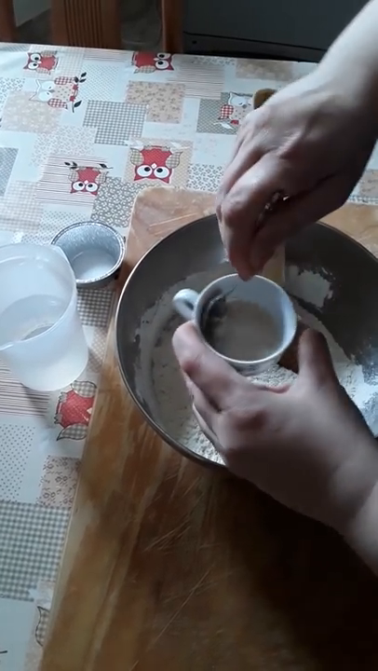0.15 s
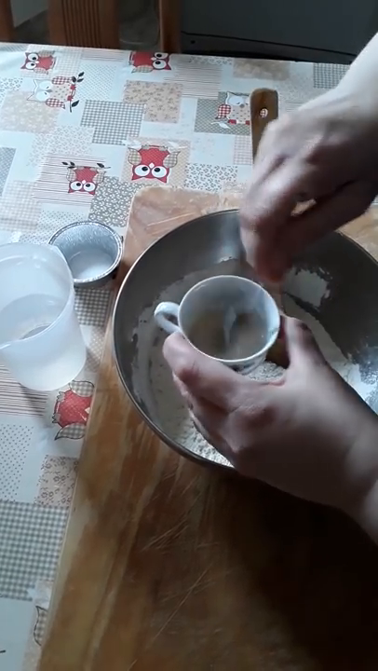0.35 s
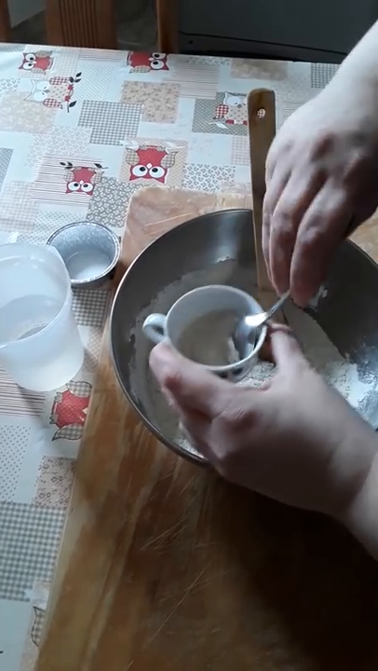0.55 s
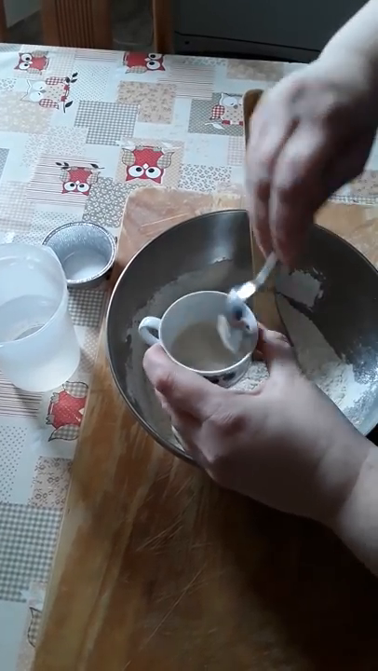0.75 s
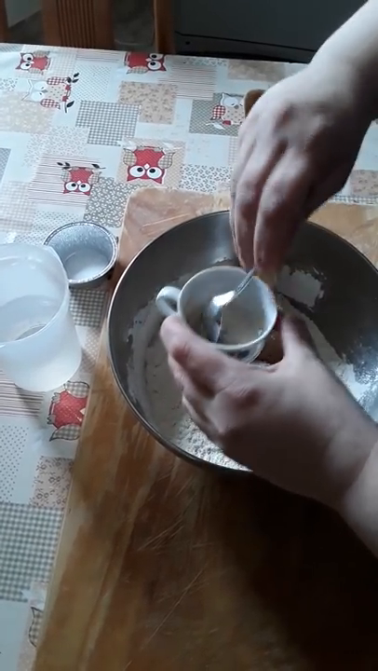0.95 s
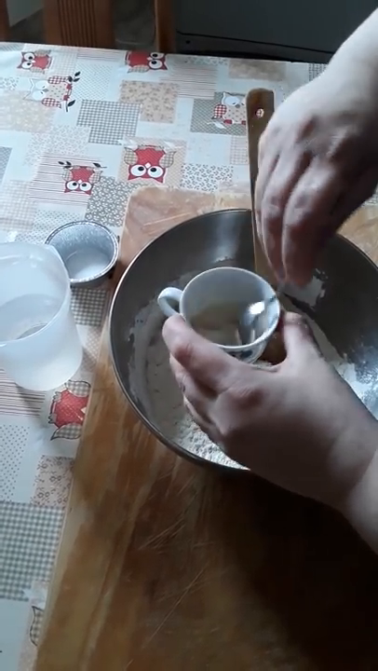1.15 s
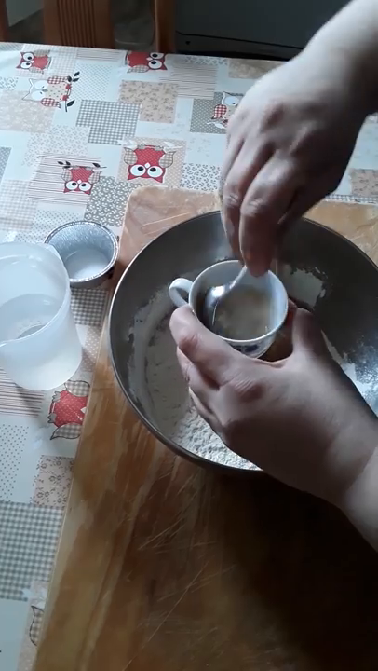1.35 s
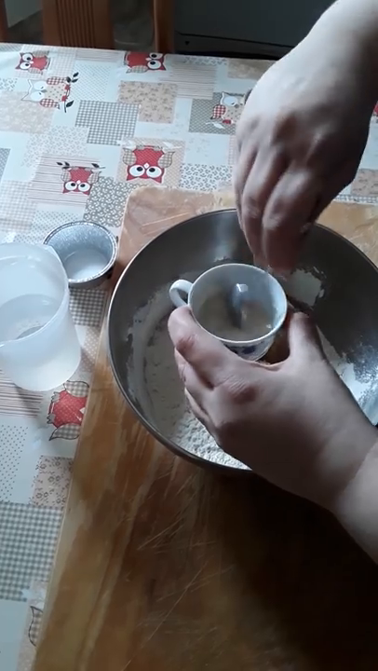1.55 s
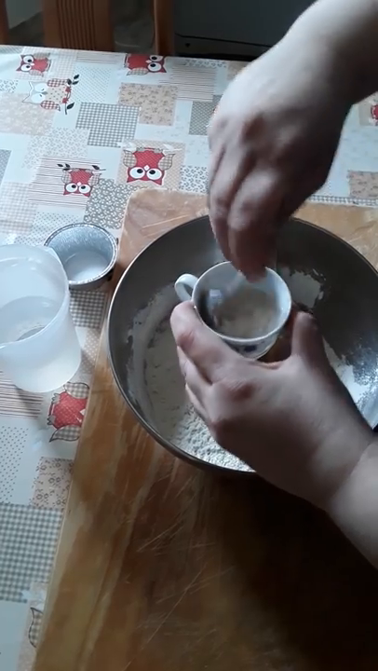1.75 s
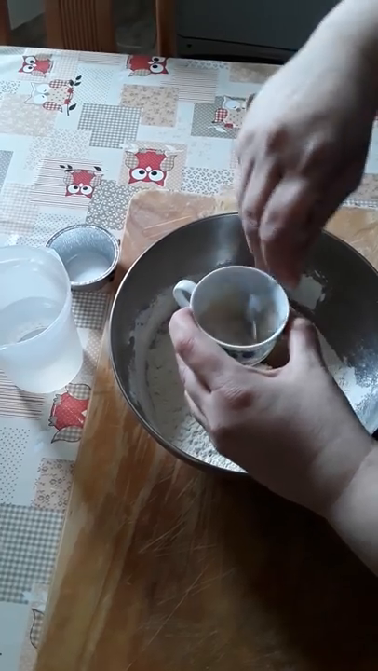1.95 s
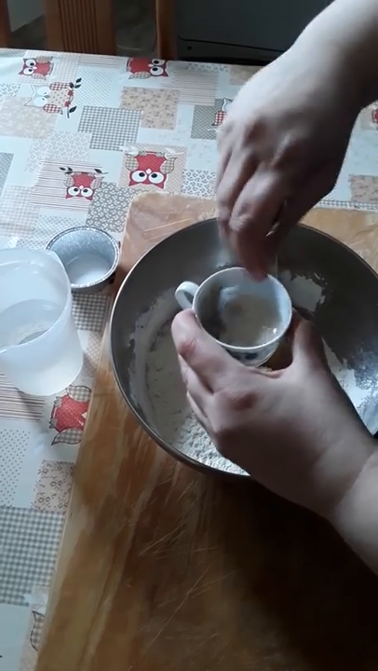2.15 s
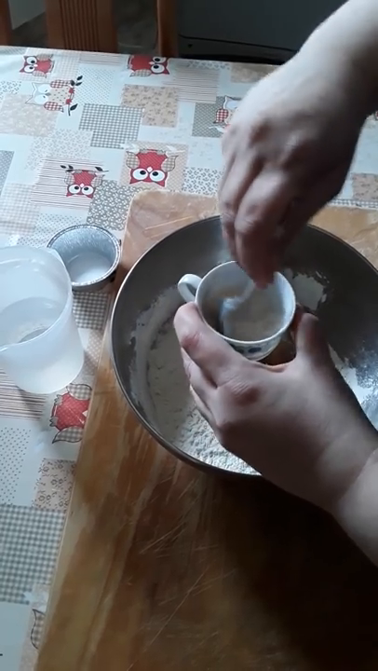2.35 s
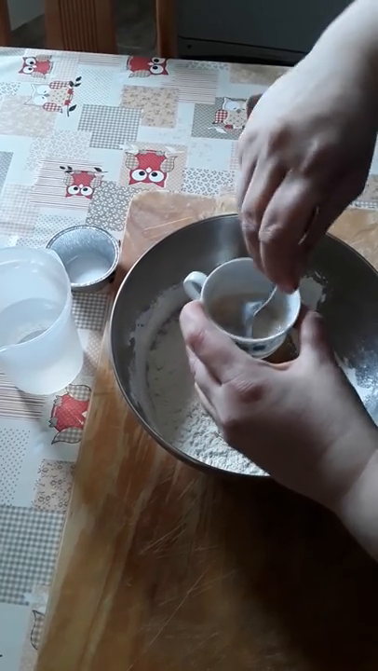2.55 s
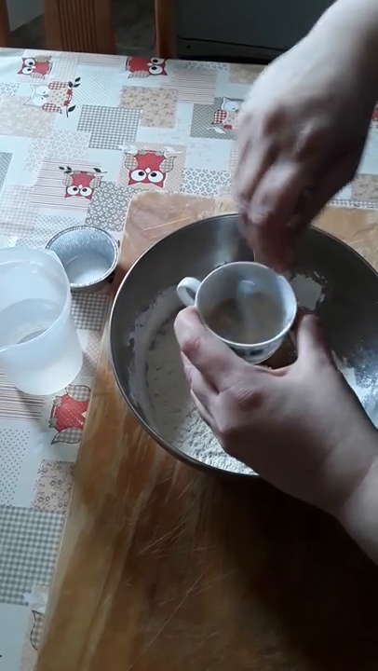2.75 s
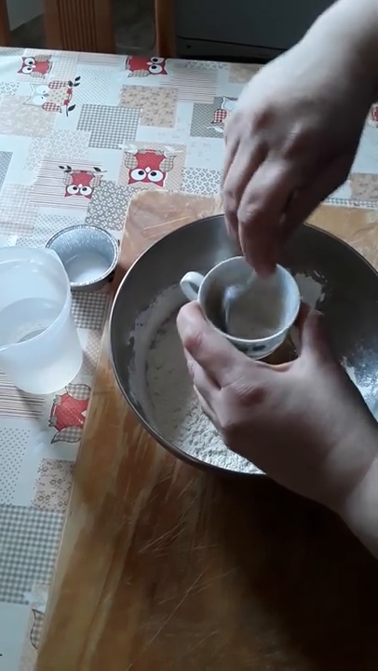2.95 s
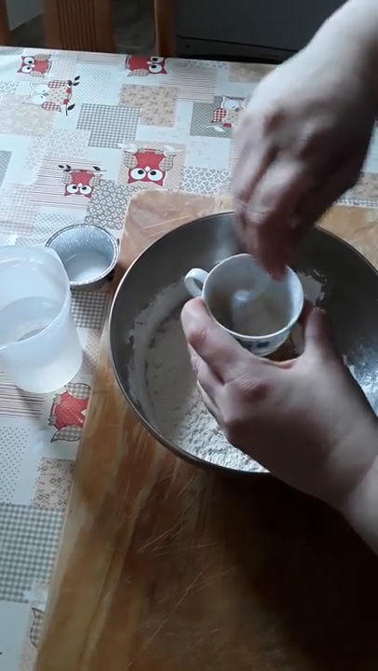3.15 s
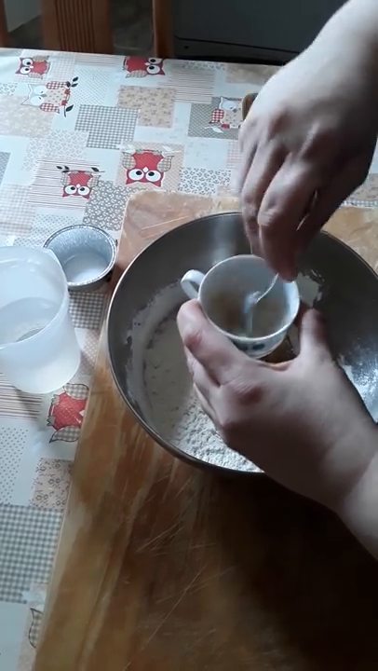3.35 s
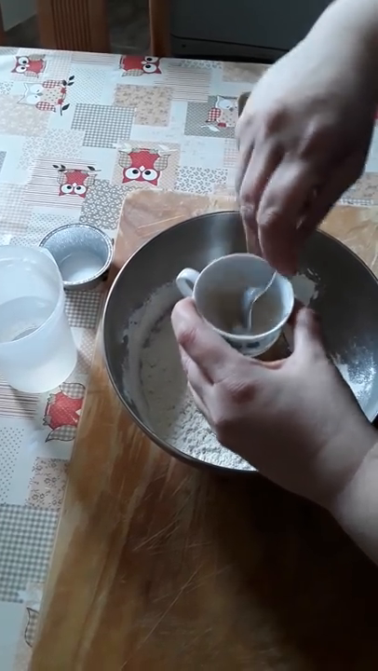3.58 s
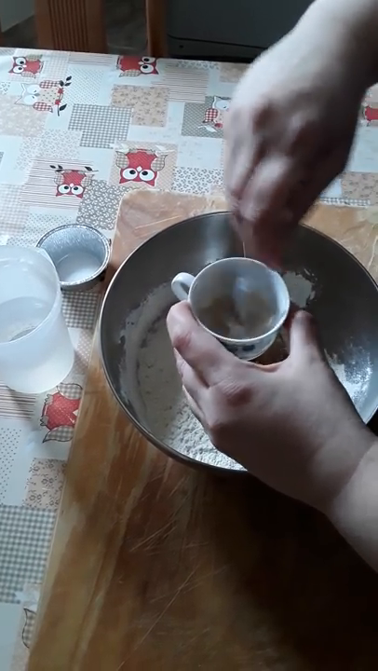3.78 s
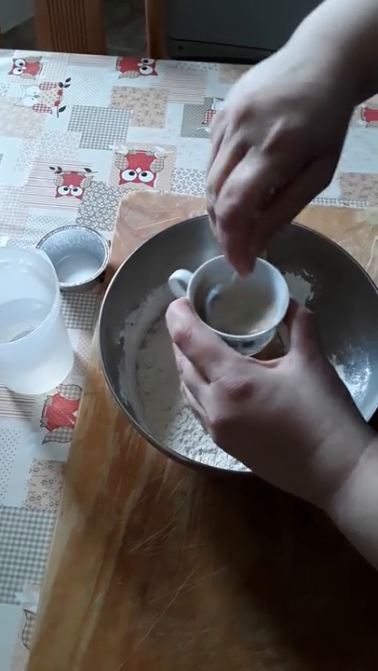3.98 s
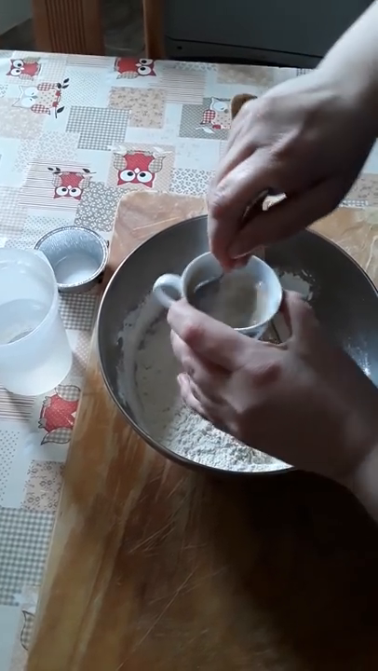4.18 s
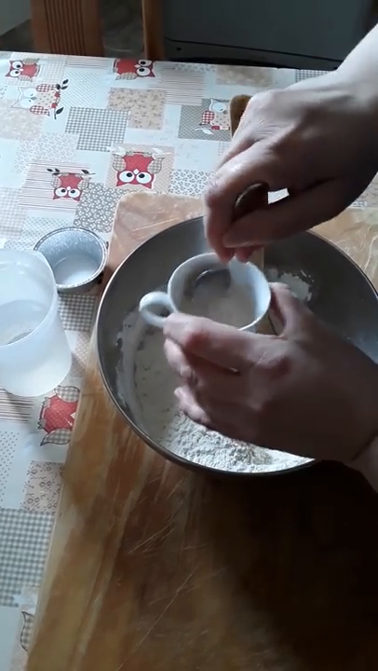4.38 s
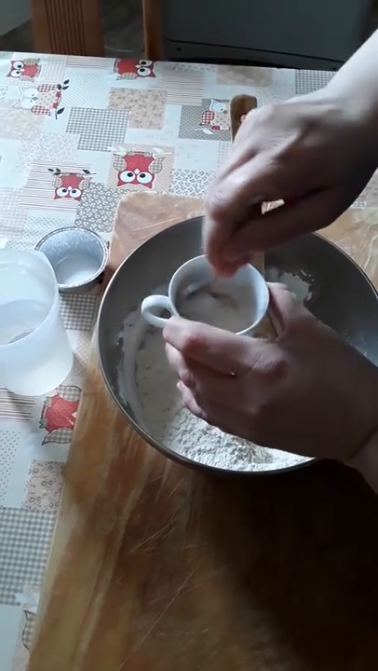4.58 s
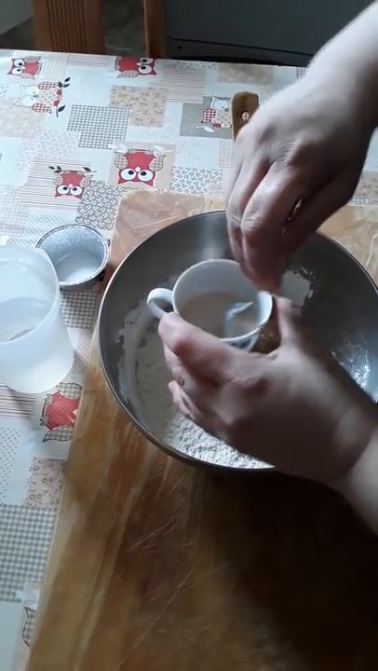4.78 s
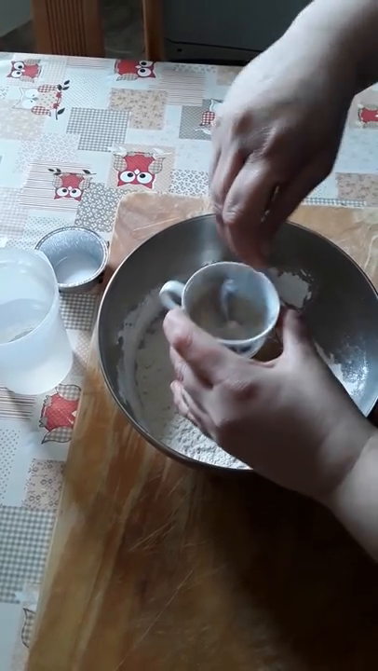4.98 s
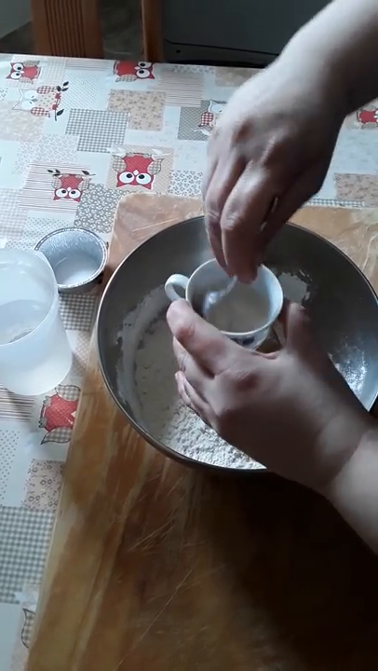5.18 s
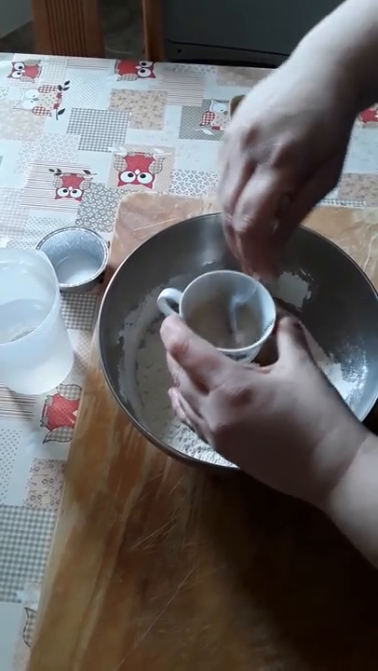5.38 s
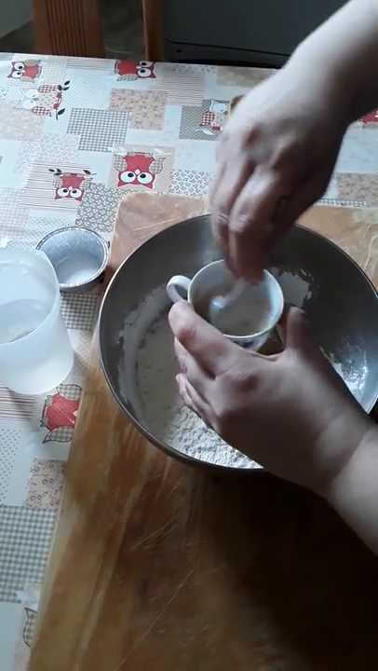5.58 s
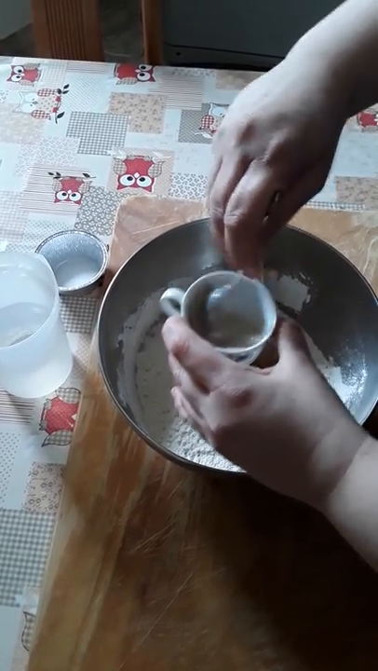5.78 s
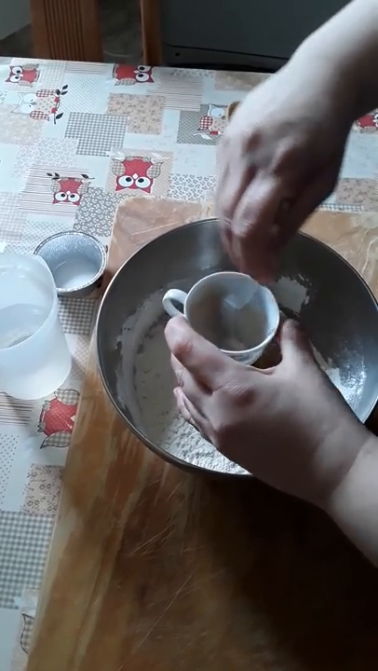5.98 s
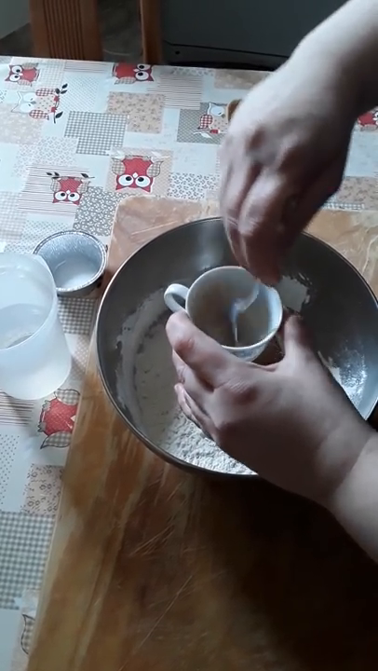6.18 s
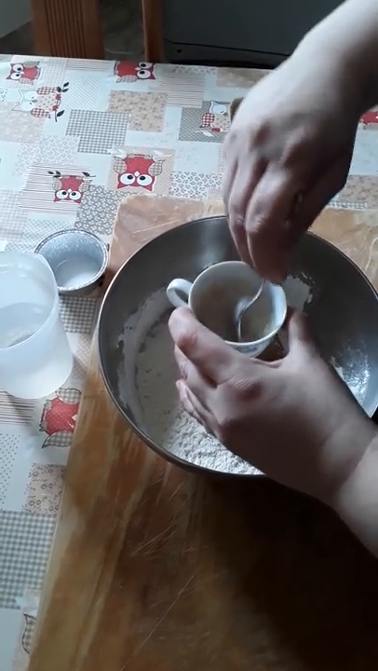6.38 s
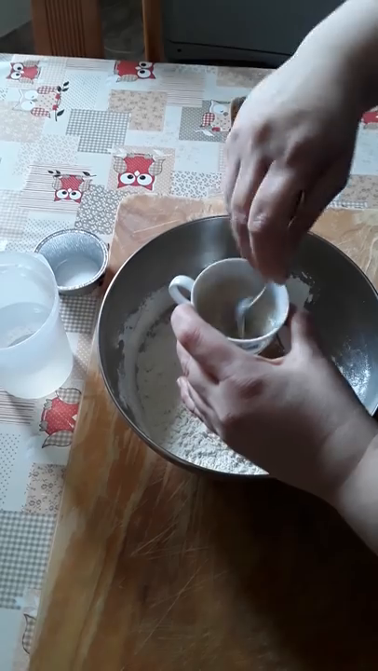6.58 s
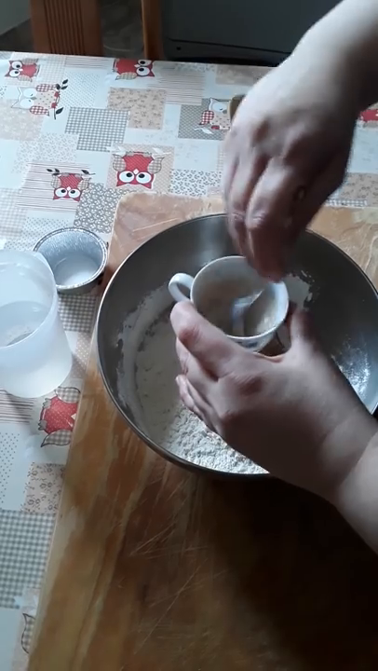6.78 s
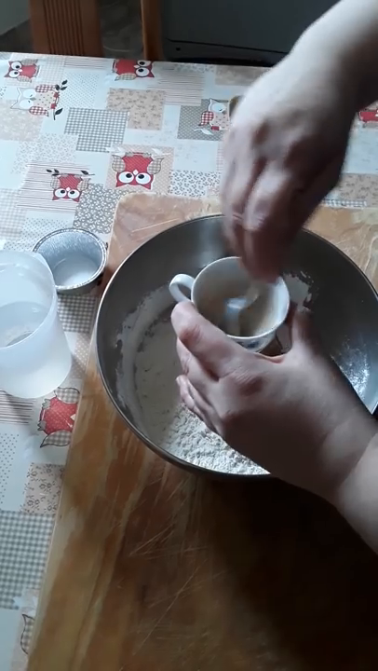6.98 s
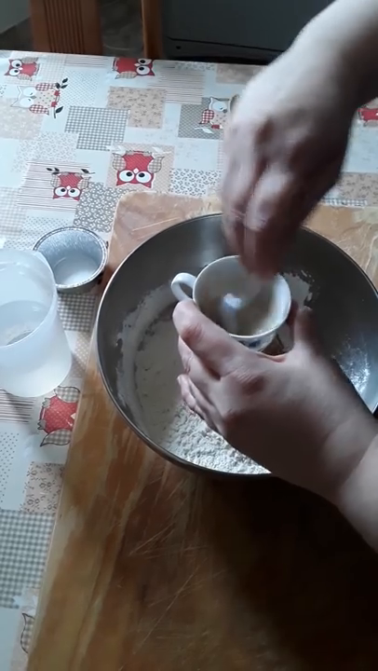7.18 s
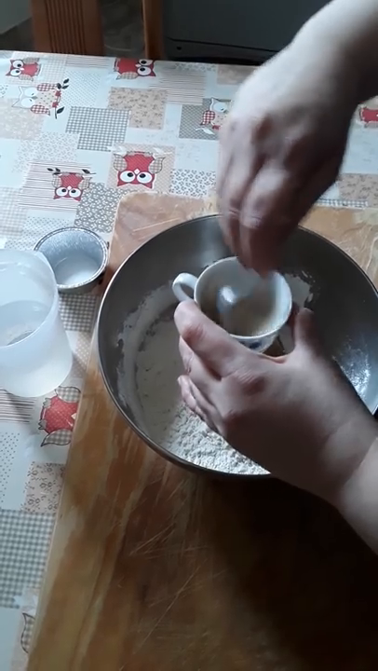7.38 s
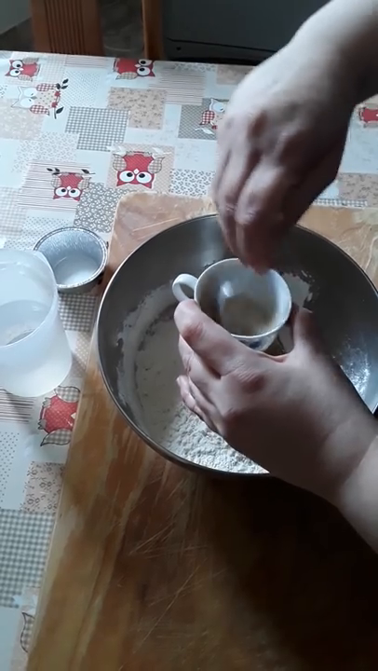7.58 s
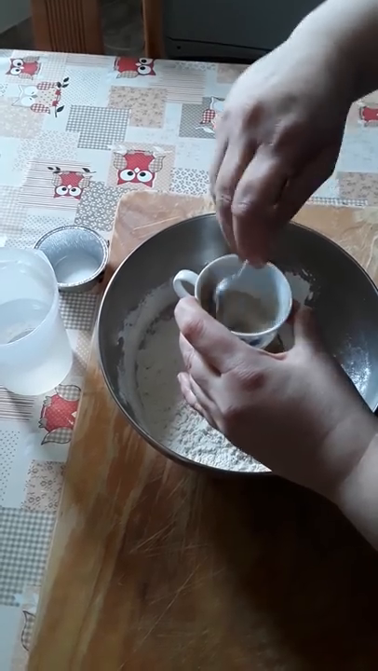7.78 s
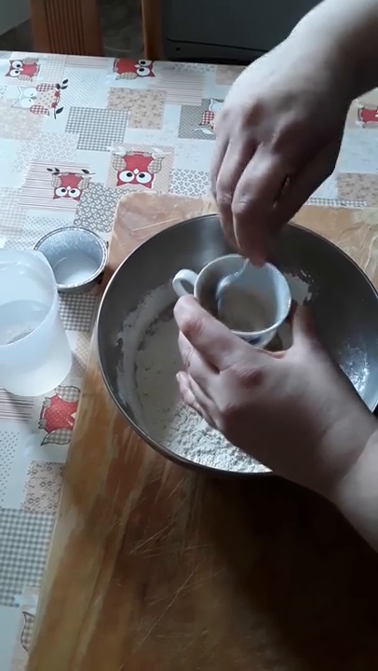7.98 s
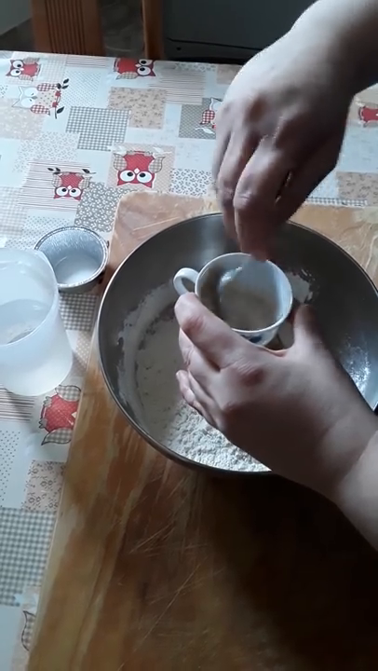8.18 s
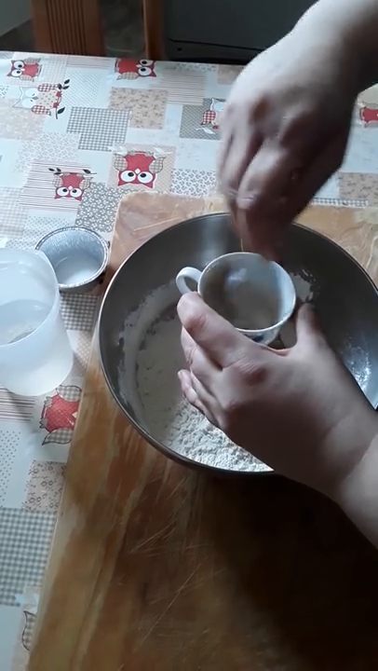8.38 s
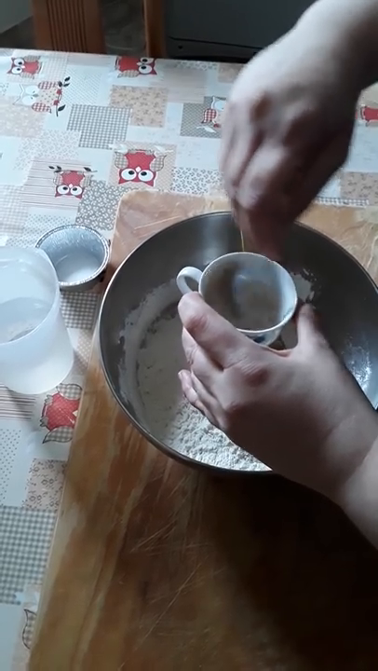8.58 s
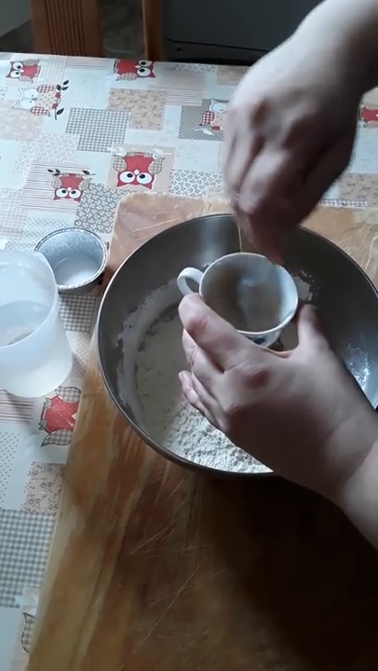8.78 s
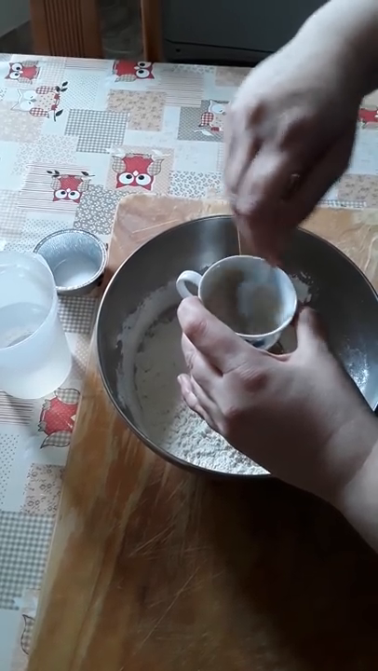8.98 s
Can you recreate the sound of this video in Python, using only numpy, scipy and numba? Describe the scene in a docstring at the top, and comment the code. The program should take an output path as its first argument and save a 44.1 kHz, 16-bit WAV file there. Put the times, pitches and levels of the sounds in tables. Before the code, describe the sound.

A metal spoon stirs water in a small china cup, clinking irregularly and rubbing round the wall in a hard, echoing kitchen.

```python
"""A steel spoon stirs water in a hand-held china cup in a hard-walled kitchen, over rumble and hiss.
The room still rings from a blow before the start; then clinks (short damped modes, a thud, a noise crack) go on.
Between them filtered random slips make the rub of the spoon on the glaze, two strokes a turn.
A far wavering sine hums from 2.7 to 6 s; three dull knocks (decaying sines) fall at 4.4 s and, close together,
near 4.9 s. From about 6.3 s the rubbing stays strong to the end."""
import sys
import numpy as np
from scipy import signal
from scipy.fft import rfft, irfft
from scipy.io import wavfile
from numba import njit

SR = 44100
rng = np.random.default_rng(int(sys.argv[2]) if len(sys.argv) > 2 else 0)


def transcribe(u):
    """Save the signal u as a 16-bit wav file named by the first command-line argument.

    u: samples, shape (n,) or (channels, n), limited to [-1, 1]; the rate is SR.
    q: integer samples, one column per channel.
    """
    v = np.clip(np.atleast_2d(u).T, -1, 1)
    q = np.round(v * 32767).astype(np.int16)
    wavfile.write(sys.argv[1], SR, q)


N = 398663
LEAD = SR // 4   # samples before time 0, so that an earlier blow can ring on in the room

# Blows of spoon on cup. Each row: start in seconds, strength in dB, dullness in dB, hollowness in dB,
# edge in dB, clack in dB, length of the chattering contact in ms.
BLOWS = [(-0.12, -16.5, 11.0, 2, 0.0, 2, 1.3), (0.4524, -35, 1, 3.0, -11.5, -5.0, 1.1),
         (0.4645, -24, 7, 0.0, -18, -1, 3.7), (0.5665, -27, 7.5, 8, -14, 7, 4.7),
         (0.5866, -6, -25, 0.5, -38, -15, 3.6), (0.672, -6, -27, 0, 7, 8, 4.2),
         (1.0553, -13, 8, 4.0, -3, 4.5, 1.9), (1.199, -32, 6.5, 6.5, -2.0, 10, 2.8),
         (1.2457, -17, -7, -7.5, -8, 3.5, 3), (1.472, -34.5, -8, -9, -7, 2, 3.7),
         (1.5085, -35.5, 6.5, 1, -17, 1.5, 0.54), (1.7137, -17.5, 3.5, 7.5, 11, -4, 5.8),
         (1.727, -16.5, -2, -4.0, -1, -8, 2.1), (1.857, -25, 1.5, -2, 7.5, -7.0, 3.7),
         (1.9094, -26.0, 6.5, -16.0, 0, 0, 2.4), (1.9272, -29.5, 4, 4.5, 4.5, 2.0, 5.1),
         (2.082, -12.5, -4.0, -1, 8, 0.5, 4.8), (2.2216, -18.0, 1, 1, 11.5, -3, 3.9),
         (2.6482, -22.0, 2.5, 3.0, -29, -2, 2.8), (2.7149, -28, 9, 8, -4.5, -6.5, 2.0),
         (2.806, -23, 5.5, 6, 12, 1, 4.6), (3.322, -17.5, 1, 4.0, 2, -4, 2.2),
         (3.5566, -14.5, 2, 3.5, 7.5, -4.0, 3.9), (3.8026, -14.5, 3.5, 5, 5, -4, 3.7),
         (4.2665, -36, 5.5, 9.5, 4, 12.5, 1.2), (4.4634, -17, -19, -8, 0, -10, 2.3),
         (5.0296, -19.5, -2, -5, -2, 0, 3.4), (5.0402, -18, 5.5, 3, -44, -3.5, 2.2),
         (5.1013, -29.5, -0.5, 1, -18, 5, 5.1), (5.1555, -32, -26.0, -29.5, -7.0, -3, 2.4),
         (5.2361, -32, -9, -11, 5, 4, 2.1), (5.2862, -33.0, -15, -16.5, -10, -9, 2.6),
         (5.312, -15.5, 4.5, -2, -12, 0.5, 2.9), (5.481, -13.5, 6.0, 1, 12.0, -0.5, 3.5),
         (5.684, -21.5, 10.0, 8.5, -2, 5.5, 1.9), (5.8143, -6, 2.5, -0.5, 9.5, 1.5, 4.4),
         (6.1029, -18.5, -4.5, 0.5, -5, 8, 3), (6.3237, -14.5, -6, 7.5, 5.5, 2, 3.1),
         (6.539, -11, 1, 4.5, -5, 0.0, 2.15), (6.7521, -10.5, -4, 2.5, 0, 0.5, 2.6),
         (6.8436, -21.5, 5.0, 4.5, -2, 6, 4.6), (6.9473, -7, -2.5, -3.5, 11.5, -0.5, 3.6),
         (7.1625, -6, -1.5, -2, 11.5, 0.5, 5.7), (7.2753, -25.5, 5.5, 5.5, 10, 10, 1.7),
         (7.366, -36, -10, 10.5, 12.0, 8, 3.6), (7.372, -17, 3.5, -14, 19, -8, 1.4),
         (7.3761, -12.5, 1.5, -3.5, 9, 2.5, 5.5), (7.4843, -33.5, 7.5, 10, 9, 9, 8.2),
         (7.491, -14.5, -10.0, -7, -7, 5, 1.5), (7.621, -15.5, -14.0, -7, 0.0, 1, 3.1),
         (7.8007, -35.5, -17, 0.0, -1, 15, 7.5), (8.1155, -47, 4.0, 1.0, 7.0, 6.0, 3.8),
         (8.121, -33.0, 5.5, 7.5, 0, 11, 5.5), (8.2315, -9, 0.5, -1.5, -2, -2.5, 4.8),
         (8.545, -18.5, 8.5, -0.5, -5, 2, 4.7), (8.6547, -7.5, -8.5, -5.5, 5.5, 0.0, 5.2),
         (8.7745, -32.5, 6.0, 9, 11, 10, 2.3), (8.976, -22.5, 6.5, 1.5, -8, -3, 6.5)]
# Cup modes damped by hand and water. Each row: family number, nominal frequency in Hz,
# nominal level within the family in dB, decay time t60 in seconds for a usual contact.
CUP_MODES = [(0, 1518, 3, 0.0079), (0, 1660, 3, 0.012), (1, 2380, 2.5, 0.0079), (1, 2580, 3.5, 0.0052),
             (2, 3345, 0.5, 0.0056), (2, 4216, -6.5, 0.0094), (2, 4770, -4.5, 0.0067),
             (3, 5910, 0.5, 0.011), (3, 6210, 5, 0.0029), (4, 7360, -6.5, 0.0048), (4, 7830, -3, 0.0063),
             (4, 8020, -8.5, 0.014), (4, 8180, -4, 0.0059), (5, 9260, -1, 0.0057), (5, 10500, 4, 0.0057),
             (5, 12030, -10, 0.0037), (5, 13100, -21.5, 0.0049), (5, 15200, -30, .004)]
# Six mode families, low to high. Each row: peak level in dB in a usual blow, then the dB gained
# per dB of strength, of dullness, of hollowness, of edge and of clack.
MODE_FAMILIES = [(-30.5, 0.33, 1, -0.041, 0.03, 0.11), (-20.5, 0.76, 0, 0.81, 0.029, 0.07),
                 (-24.5, 1, 0.38, -0.12, 0, 0.85), (-20.5, 1, 0.31, 0.24, 0.08, 0),
                 (-15.5, 1, 0.055, -0.066, 0, 0), (-33.5, 1, 0.031, 0.17, 0.97, 0.078)]
USUAL_DB, USUAL_CONTACT_MS = -15, 2.5   # the usual blow
LOOSENESS = 0.6   # exponent from contact length to decay time
MODE_SPREAD_DB, DETUNE = 3, 0.007   # random spread of mode level, and of pitch as a share
REST_HZ, FOLLOW = 2400, 0.67   # hollow pitch with level water; how closely family 1 follows it
RISE_MS = 0.56
BOUNCE_DB = -1   # all micro-bounces together, against the first touch
THUD_HZ, THUD_DB = 864, -4   # dull push of the blow; level against the lowest family
# Unpitched crack of steel on glaze: band, length as a share of the contact, level against the strength
CRACK_BAND_HZ, CRACK_SHARE, CRACK_DB = (3000, 10900), 0.26, -10
CRACK_PER_EDGE, CRACK_PER_CLACK = 0.6, 0.47   # dB per dB


def clinks(hollow_pitch):
    """Modal synthesis: a first touch and a chatter of bounces strike all modes, with a thud and a crack."""
    out = np.zeros(N + LEAD + SR // 8)
    t = np.arange(SR // 20) / SR
    family, mode_hz, mode_db, mode_t60 = np.transpose(CUP_MODES)[:, :, None]
    members = family.T == np.arange(6)[:, None]   # sums the modes of each family
    crack_band = signal.butter(3, CRACK_BAND_HZ, "band", fs=SR, output="sos")
    for s, db, dull_db, hollow_db, edge_db, clack_db, contact_ms in BLOWS:
        hollow_hz = hollow_pitch[max(round(s * SR), 0)]
        family_db = np.array(MODE_FAMILIES) @ [1, db - USUAL_DB, dull_db, hollow_db, edge_db, clack_db]

        # The place of contact changes strengths and pitches a little
        strength, tune = rng.standard_normal((2, len(CUP_MODES), 1))
        follow = np.where(family == 1, (hollow_hz / REST_HZ) ** FOLLOW, 1)
        pitch = mode_hz * (1 + DETUNE * tune) * follow
        # A looser grip lets both chatter and ring last longer
        free = (contact_ms / USUAL_CONTACT_MS) ** LOOSENESS
        gain = from_db(mode_db + MODE_SPREAD_DB * strength)
        rings = members @ (gain * blow(t, pitch, mode_t60 * free, RISE_MS / 1000))

        bounce = rng.laplace(size=SR // 100)
        chatter = bounce ** 2 * np.sign(bounce)
        chatter = chatter * np.exp(-(1000 * t[:len(bounce)] / contact_ms) ** 2)
        chatter = from_db(BOUNCE_DB) * chatter / np.sqrt(np.sum(chatter ** 2))
        chatter[0] = 1   # the first touch
        rings = signal.fftconvolve(rings, chatter[None], axes=1)[:, :len(t)]
        sound = from_db(family_db) / np.abs(rings).max(axis=1) @ rings   # each family at its peak level

        sound += from_db(family_db[0] + THUD_DB) * blow(t, THUD_HZ, 0.0057, 0.00039)

        grit = rng.standard_normal(len(t)) * np.exp(-1000 * t / (CRACK_SHARE * contact_ms))
        crack = signal.sosfilt(crack_band, grit)
        crack_db = db + CRACK_DB + CRACK_PER_EDGE * edge_db + CRACK_PER_CLACK * clack_db
        sound += from_db(crack_db) * crack / np.abs(crack).max()

        at = LEAD + round(s * SR)
        out[at:at + len(t)] += sound
    return out[:N + LEAD]


# The spoon's way along the glaze. Each row: time in seconds, hollow part in dB before the stroke shape,
# hollow pitch in Hz with level water, ringing part in dB before the stroke shape.
STIR_PATH = [(0, -62, 2400, -72), (.28, -71, 2440, -69), (.33, -50, 2500, -60.5), (.54, -75, 2620, -72),
             (.592, -44, 3040, -41), (.68, -71, 2640, -56), (.857, -87, 2430, -66), (1.079, -79, 2350, -86),
             (1.3, -66, 2300, -50), (1.55, -64.5, 2750, -76), (1.656, -55.5, 2400, -78),
             (1.78, -72, 2440, -47.5), (1.93, -55, 2580, -56), (2.111, -50, 2350, -63),
             (2.357, -47, 2420, -70), (2.46, -71, 2500, -75), (2.558, -51, 2450, -76),
             (2.816, -50.5, 2450, -54), (3.09, -49, 2470, -61), (3.344, -51.5, 2450, -64),
             (3.585, -48, 2310, -58), (3.83, -49, 2400, -59), (3.97, -49.5, 2360, -56),
             (4.07, -72, 2300, -79), (4.275, -73, 2250, -80), (4.582, -62.5, 2400, -65),
             (4.66, -57, 2300, -63), (4.69, -64, 3390, -54), (5.01, -55, 3540, -65.5),
             (5.05, -52, 2500, -54), (5.2, -74, 2590, -64), (5.31, -61, 2650, -63), (5.531, -43, 2660, -49),
             (5.694, -56, 2960, -62), (5.865, -47, 2270, -39.5), (6.185, -45.5, 2750, -51.5),
             (6.26, -57, 2570, -60), (6.336, -49.5, 2470, -45), (6.974, -42, 2590, -52),
             (7.7, -43, 2670, -50), (7.77, -45.5, 2650, -48), (7.914, -44, 2650, -49.5),
             (8.326, -40.5, 2540, -52.5), (8.885, -46, 2660, -49), (9.04, -43.5, 2620, -59)]
# The spoon goes round. Each row: time in seconds, turns done.
SPOON_TURNS = [(0, -.6), (.368, 1), (1.3, 5), (1.55, 6), (2.111, 9), (2.357, 10), (2.558, 11), (3.09, 13),
               (3.83, 16), (4.275, 18), (4.582, 19), (4.857, 20), (5.1, 21), (5.531, 23), (5.865, 24),
               (6.09, 25), (6.58, 27), (6.974, 29), (9.04, 38.73)]
# Two strokes a turn, far and near wall. Each row: place in the turn from 0 to 1, length in turns
# (hollow part), hollow gain in dB, ringing gain in dB.
TURN_STROKES = [(0.0, 0.55, 0, 1.5), (.45, 0.59, 0, 0)]
RINGING_SHARE = 0.75   # the wall rings for this share of the stroke
SLOSH, SLOSH_PEAK = 0.094, 0.59   # widest swing as a share of the hollow pitch; place of the top in the turn
SLOSH_FROM_DB, SLOSH_FULL_DB = -53.5, -39   # the harder the stirring, the wider the swing


def stirring():
    """Periodic modulation: each turn presses twice on the wall and piles up the water once, bending the pitch."""
    (turns,) = in_time(SPOON_TURNS)
    hollow_db, level_hz, ringing_db = in_time(STIR_PATH)
    power = 0
    for place, length, *stroke_db in TURN_STROKES:
        away = (turns - place + .5) % 1 - .5   # turns from the middle of the stroke
        widths = length * np.array([[1], [RINGING_SHARE]])
        power = power + from_db(stroke_db)[:, None] ** 2 * np.exp(-16 * (away / widths) ** 2)
    pressure = from_db([hollow_db, ringing_db]) * np.sqrt(power)
    vigour = np.clip((hollow_db - SLOSH_FROM_DB) / (SLOSH_FULL_DB - SLOSH_FROM_DB), 0, 1)
    slosh = SLOSH * vigour * np.cos(2 * np.pi * (turns - SLOSH_PEAK))
    return pressure, level_hz * (1 + slosh)


# Fixed air modes in the cup, below and above the gliding hollow pitch. Each row: centre in Hz,
# width of one filter pass in Hz, relative level in dB.
AIR_MODES = [(1510, 450, -4), (3370, 950, -16.5), (4430, 740, -20)]
# Wall under rubbing. Each row: centre in Hz, width of one filter pass in Hz, relative level in dB.
WALL_MODES = [(4450, 700, 1), (5770, 1300, 9.5), (6600, 3800, 2), (7900, 1200, 11.5), (10500, 330, -9)]
RUB_PER_S, GRAIN_DB = 4200, 4   # mean slips per second; dB scale of their exponential size spread
RUB_FLICKER_DB = 1.4
HOLLOW_WIDTH_HZ = 360   # of one filter pass
WANDER, WANDER_PER_S = 0.015, 10   # random share of the hollow pitch, and its rate
RIM_HZ, RIM_DB_PER_KHZ = 3110, -15   # near the rim the hollow pitch is high and the fixed air modes are weaker


def rubbing(pressure, hollow_hz):
    """Friction excitation: dense random slips drive the gliding air resonance, fixed air modes and the wall."""
    sizes = from_db(GRAIN_DB * np.minimum(rng.exponential(1, N), 5)) * rng.choice([-1, 1], N)
    struck = rng.random(N) < RUB_PER_S / SR
    slips = sizes * struck * from_db(RUB_FLICKER_DB * drift(19))
    rim_db = RIM_DB_PER_KHZ * np.maximum(hollow_hz - RIM_HZ, 0) / 1000
    fixed_air = body(slips, AIR_MODES) * from_db(rim_db)
    wandering_hz = hollow_hz * (1 + WANDER * drift(WANDER_PER_S))
    hollow = sharp(slips, wandering_hz, HOLLOW_WIDTH_HZ) - fixed_air
    ringing = body(slips, WALL_MODES)
    return (pressure * [rms_one(hollow), rms_one(ringing)]).sum(axis=0)


# Knocks on the table. Each row: start in seconds, level in dB before decay, frequency in Hz, t60 in seconds.
TABLE_KNOCKS = [(4.399, -40, 195, 0.055), (4.873, -38.5, 485, 0.028), (4.891, -33.5, 456, 0.021)]


def knocks():
    """Impulse response of one damped mode: each dull knock on the table is a decaying sine."""
    out = np.zeros(N)
    t = np.arange(SR // 4) / SR
    for s, db, hz, t60 in TABLE_KNOCKS:
        out[round(s * SR):][:len(t)] += from_db(db) * blow(t, hz, t60, 0.00041)
    return out


# Reverberation time. Each row: frequency in Hz, t60 in seconds.
ROOM_DECAY = [(400, 1), (1500, 0.77), (3000, 0.61), (6000, 0.6), (10000, 0.27), (16000, 0.82)]
# Table, then ceiling. Each row: delay in ms, level in dB against the direct sound.
EARLY_ECHOES = [(2.5, -24), (9.0, -15)]
ROOM_DB, ROOM_GAP_MS, ROOM_BUILD_MS = -6, 8.7, 2.1   # tail: level, silence before it, build-up


def kitchen(x):
    """Reverberation by convolution: early echoes, then a dense tail that builds up and dies band by band."""
    t, tail = np.arange(SR) / SR, 0
    edges = 150 * 2 ** np.arange(0, 7.1, .5)   # half octaves
    for low, high in zip(edges, edges[1:]):
        band_filter = signal.butter(2, [low, high], "band", fs=SR, output="sos")
        band = signal.sosfilt(band_filter, rng.standard_normal(SR))
        tail = tail + band * from_db(-60 * t / at_hz(ROOM_DECAY, np.sqrt(low * high)))
    tail = tail * (1 - np.exp(-(np.maximum(1000 * t - ROOM_GAP_MS, 0) / ROOM_BUILD_MS) ** 2))
    response = from_db(ROOM_DB) * tail / np.sqrt(np.sum(tail ** 2))
    response[0] += 1   # direct sound
    for ms, db in EARLY_ECHOES:
        response[round(ms * SR / 1000)] += from_db(db)
    return signal.fftconvolve(x, response)[:len(x)]


# Far tone. Each row: time in seconds, frequency in Hz before wavering, rms level in dB before flutter.
FAR_HUM = [(2.7, 115, -62), (3.3, 128, -73), (3.7, 150, -64.5), (4.85, 150, -65), (5.1, 140, -83.5),
           (5.5, 135, -64), (6.0, 130, -70)]


def hum():
    """Frequency and amplitude modulation: a far low sine wavers, fades in and goes."""
    hz, level_db = in_time(FAR_HUM)
    t = np.arange(N) / SR
    fade = np.clip(np.minimum(t - FAR_HUM[0][0], FAR_HUM[-1][0] - t) / 0.2, 0, 1)
    flutter_db, waver_hz = 2.5 * drift(6), 3 * drift(5)
    phase = 2 * np.pi * np.cumsum(hz + waver_hz) / SR
    return fade * np.sqrt(2) * from_db(level_db + flutter_db) * np.sin(phase)


# Room rumble in time. Each row: time in seconds, rms level in dB before its slow drift.
RUMBLE_LEVEL = [(0.0, -56), (0.27, -65), (7.4, -61), (9.04, -56)]
# Spectrum of the rumble. Each row: frequency in Hz, relative density in dB per Hz.
RUMBLE_SPECTRUM = [(20, -24), (40, -18.5), (75, -6), (140, -2), (250, -5), (480, -9.5), (700, -15),
                   (1000, -17), (1500, -46)]


def rumble():
    """Spectral shaping: low noise whose level drifts slowly."""
    level_db = in_time(RUMBLE_LEVEL)[0] + 0.5 * drift(2.0)
    return from_db(level_db) * coloured(RUMBLE_SPECTRUM)


# Spectrum of the hiss above 300 Hz. Each row: frequency in Hz, relative density in dB per Hz.
HISS_SPECTRUM = [(700, -7.5), (1500, 9.5), (3000, 3.5), (5000, -30.5), (8000, 3), (11500, -15.5),
                 (16000, -26)]
HISS_DB = -67.5   # rms
WHINE_HZ, WHINE_WIDTH_HZ, WHINE_DB = 13400, 200, -81   # thin steady band high in the hiss; rms level


def hiss():
    """Stationary noise: microphone hiss of a fixed spectrum, with a narrow resonant band."""
    band = resonate(rng.standard_normal(N), np.full(N, float(WHINE_HZ)), WHINE_WIDTH_HZ, SR)
    whine = from_db(WHINE_DB) * rms_one(band)
    return from_db(HISS_DB) * coloured([(300, -19.5)] + HISS_SPECTRUM) + whine


def blow(t, hz, t60, rise):
    """Damped oscillation: a decaying sine with a short exponential onset (rise in seconds)."""
    return np.sin(2 * np.pi * hz * t) * from_db(-60 * t / t60) * (1 - np.exp(-t / rise))


def body(slips, resonances):
    """Modal superposition: each slip drives every resonance with a random sign of its own."""
    return sum(from_db(db) * sharp(slips * rng.choice([-1, 1], N), hz, w) for hz, w, db in resonances)


def sharp(x, hz, width_hz):
    """Cascaded resonance: two equal passes give steep flanks."""
    hz = hz * np.ones(N)
    return resonate(resonate(x, hz, width_hz, SR), hz, width_hz, SR)


@njit
def resonate(x, hz, width_hz, sr):
    """Two-pole resonance of gain near 1 at a centre that may move."""
    out = np.zeros(len(x))
    r = np.exp(-np.pi * width_hz / sr)
    for i in range(2, len(x)):
        drive = (1 - r * r) / 2 * (x[i] - x[i - 2])
        out[i] = drive + 2 * r * np.cos(2 * np.pi * hz[i] / sr) * out[i - 1] - r * r * out[i - 2]
    return out


def coloured(spectrum):
    """Spectral shaping: steady noise of a given spectrum, rms 1."""
    hz = np.maximum(np.arange(N // 2 + 1) * SR / N, 1)
    return rms_one(irfft(rfft(rng.standard_normal(N)) * from_db(at_hz(spectrum, hz)), N))


def drift(rate):
    """Low-pass noise: a slow random wander of rms 1 (corner in Hz)."""
    r = np.exp(-2 * np.pi * rate / SR)
    wander = signal.lfilter([1], [1, -2 * r, r * r], rng.standard_normal(N + SR))
    return rms_one(wander[SR:])   # drops the filter's first second


def in_time(rows):
    """Linear interpolation of every column over the time in the first."""
    s, *columns = np.transpose(rows)
    return [np.interp(np.arange(N) / SR, s, c) for c in columns]


def at_hz(points, hz):
    """Interpolation on a logarithmic frequency axis."""
    points = np.array(points)
    return np.interp(np.log(hz), np.log(points[:, 0]), points[:, 1])


def from_db(db):
    """Amplitude ratio of a level in decibels."""
    return 10 ** (np.asarray(db) / 20)


def rms_one(x):
    """Normalisation to unit root-mean-square."""
    return x / np.sqrt(np.mean(x ** 2) + 1e-20)


def scene():
    """Superposition: cup and table reverberate in the room, over the background."""
    pressure, hollow_hz = stirring()
    near = clinks(hollow_hz)
    near[LEAD:] += rubbing(pressure, hollow_hz) + knocks()
    background = rumble() + hum() + hiss()
    return (kitchen(near)[LEAD:] + background)[None]


CUTOFF_HZ = 16700   # 80 dB down from here up


def record(dry):
    """Soft saturation rounds the loudest peaks; a steep low-pass cuts the top."""
    rounded = dry / (1 + np.abs(dry / .95) ** 4) ** .25
    return signal.sosfilt(signal.cheby2(14, 80, CUTOFF_HZ, fs=SR, output="sos"), rounded)


dry = scene()
out = record(dry)
transcribe(out)
```